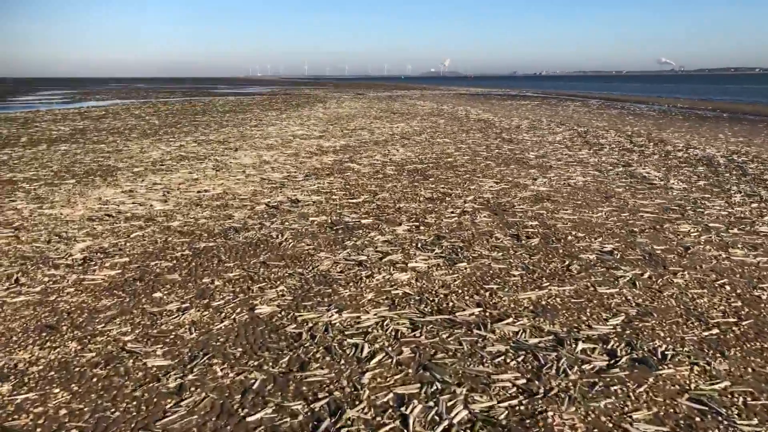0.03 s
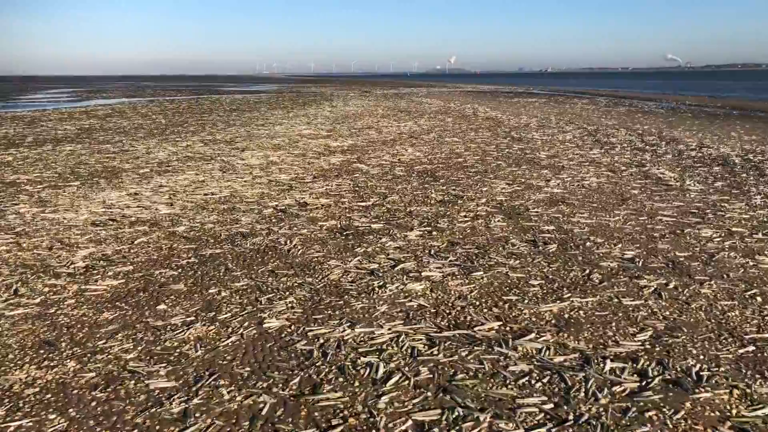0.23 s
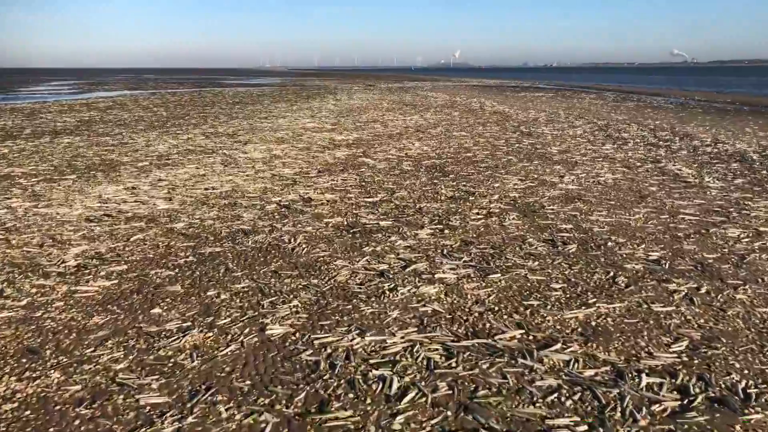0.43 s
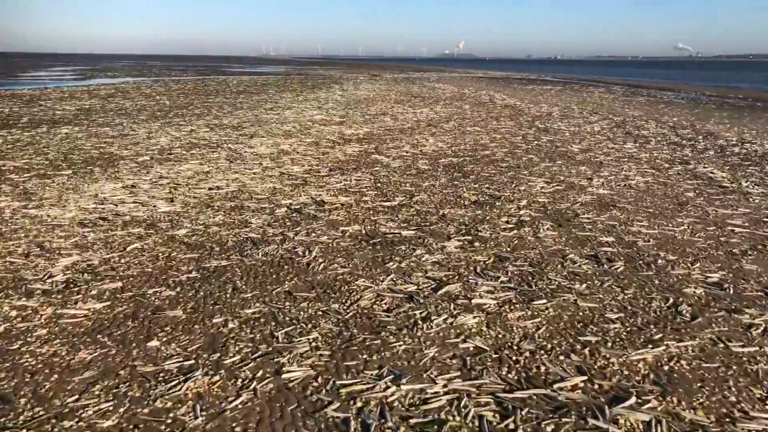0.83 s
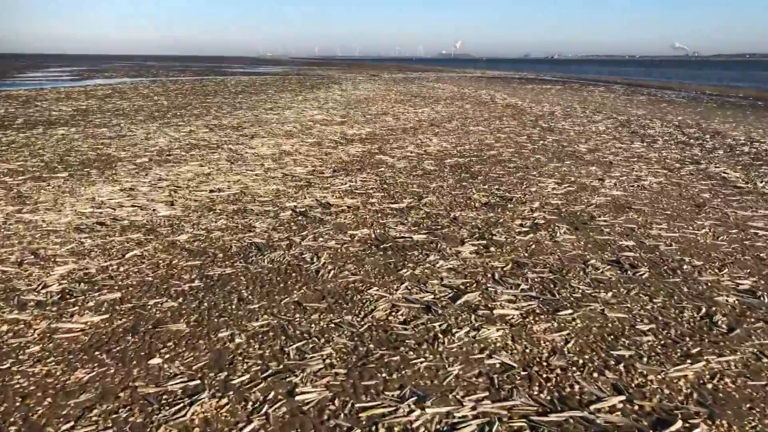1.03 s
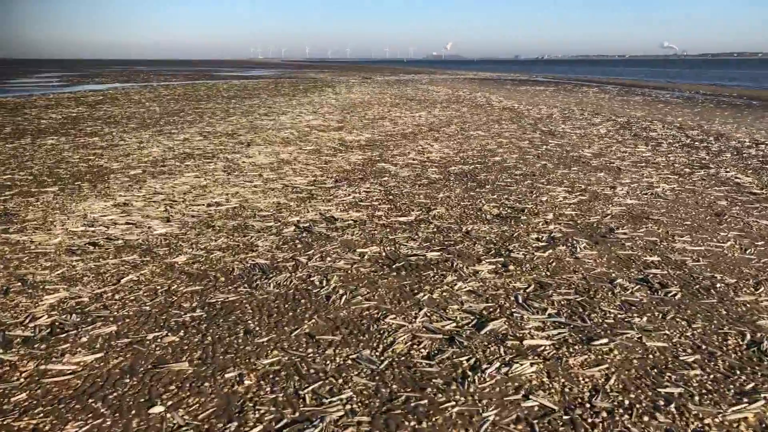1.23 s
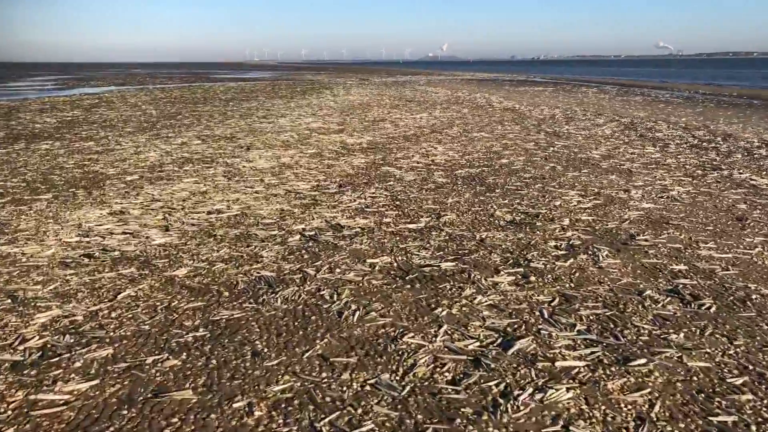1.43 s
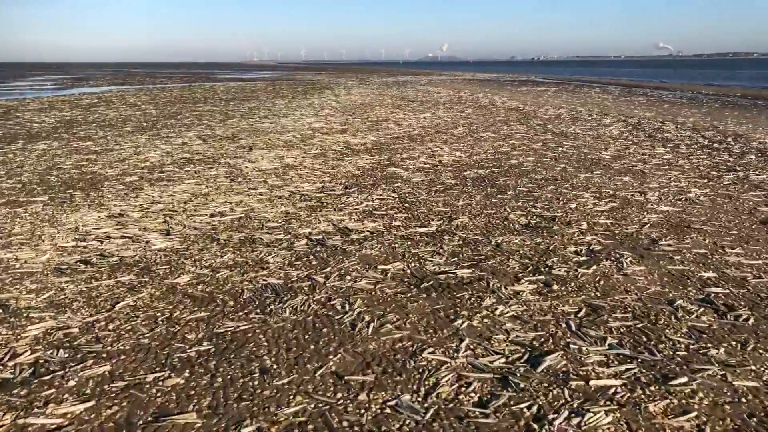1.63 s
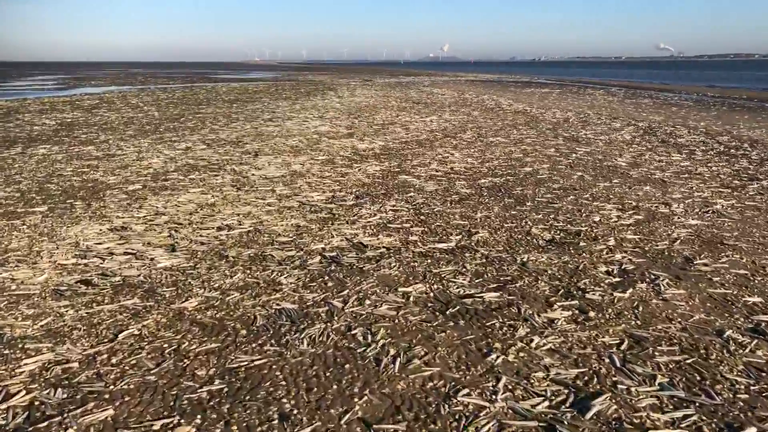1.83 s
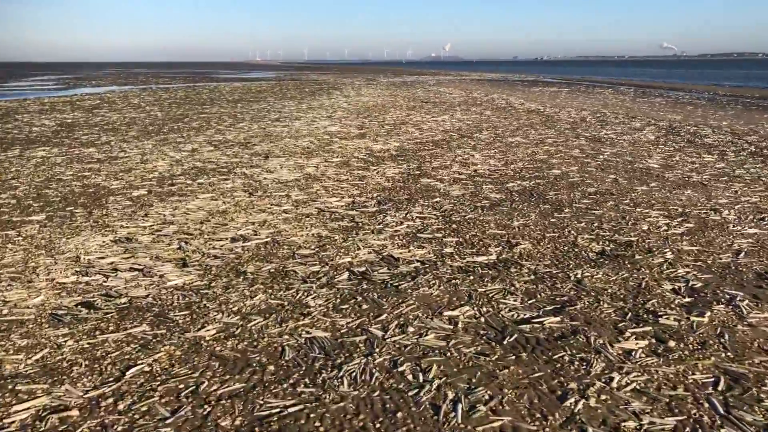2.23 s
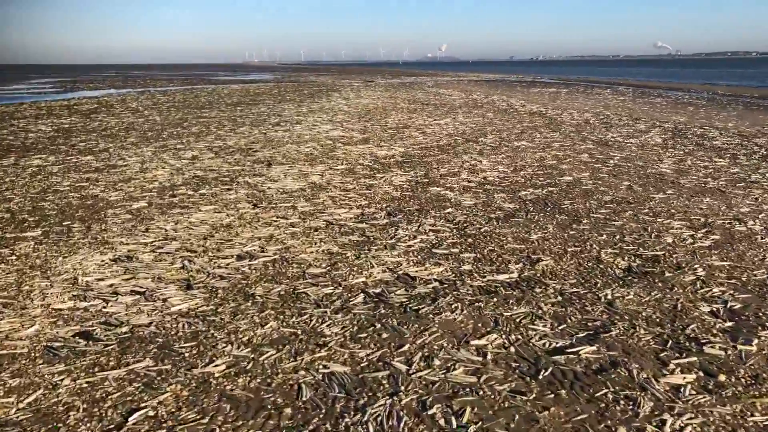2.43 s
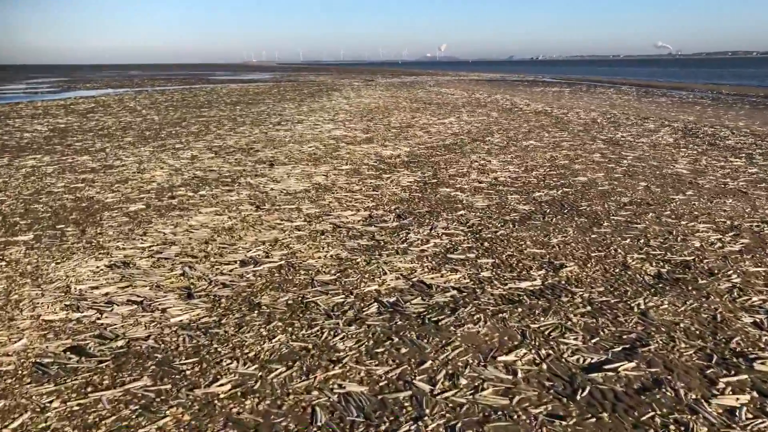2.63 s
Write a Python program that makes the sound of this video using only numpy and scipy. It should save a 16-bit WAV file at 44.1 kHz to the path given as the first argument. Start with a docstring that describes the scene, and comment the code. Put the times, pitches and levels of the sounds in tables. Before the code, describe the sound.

Shells crunching and snapping under slow footsteps, with light wind rumbling on the microphone.

```python
"""Slow steps over empty shells on an open beach flat, close to the microphone, in light wind.
A few shells snap as the weight shifts, then the heaviest footfall crushes a mass of them near 0.5 s.
Lighter crunches follow near 1 s, 1.6 s and 2.2 s, and single snaps close the scene. Throughout, wind
rumbles, tread and gusts thump at the microphone, and every crack sweeps downward, as its treble
travels faster than its bass."""
import sys
import numpy as np
from scipy import signal
from scipy.fft import rfft, irfft
from scipy.io import wavfile
from scipy.ndimage import uniform_filter1d

SR = 44100
rng = np.random.default_rng(int(sys.argv[2]) if len(sys.argv) > 2 else 0)


def dump_mix(stems):
    """Bounce the given channels to the path in sys.argv[1] as a 16-bit WAV at rate SR."""
    frames = np.atleast_2d(stems).T  # one column per channel
    limited = np.clip(frames, -1, 1)  # hard clip at full scale
    pcm = np.round(limited * 32767).astype(np.int16)
    wavfile.write(sys.argv[1], SR, pcm)


N = 119070
TOP_HZ = 16100  # upper edge of the splinters and of the recorder


def amp(db):
    return 10 ** (np.asarray(db) / 20)


def unit_energy(x):
    return x / np.sqrt(np.sum(x ** 2) + 1e-20)


def level_curve(points):
    """Gain at each sample, from (t/s, level/dB) points."""
    return amp(np.interp(np.arange(N) / SR, *np.transpose(points)))


def colour(points, hz):
    """Gain at each frequency, from (f/Hz, level/dB) points."""
    f, db = np.transpose(points)
    return amp(np.interp(np.log(hz + 1), np.log(f), db))


def noise(points):
    """Noise of rms 1 with the given spectral shape."""
    spectrum = rfft(rng.standard_normal(N)) * colour(points, np.fft.rfftfreq(N, 1 / SR))
    return unit_energy(irfft(spectrum, N)) * np.sqrt(N)


def add(mix, start_s, sound):
    part = mix[max(round(start_s * SR), 0):][:len(sound)]
    part += sound[:len(part)]


# Spectrum of the air far out on the flat: f/Hz, relative level/dB
HISS_SPECTRUM = [(100, 0), (400, -1.5), (1000, -6), (2800, -7), (6000, -14), (10000, -24), (16000, -17)]
def distant_hiss(level_db=-57):
    """The open flat hisses steadily, far from the microphone."""
    return amp(level_db) * noise(HISS_SPECTRUM)


# Gusts at the microphone: t/s, level/dB
GUSTS = [(0, -50.5), (.13, -56), (.2, -54), (.26, -36), (.37, -41.5), (.42, -32.5), (.47, -46), (.52, -38),
         (.6, -37.5), (.69, -46), (.76, -36), (.88, -35.5), (.96, -42), (1.03, -34.5), (1.13, -43),
         (1.2, -51), (1.3, -49.5), (1.36, -41), (1.47, -41), (1.549, -28.5), (1.63, -42), (1.7, -44),
         (1.78, -56), (1.88, -43.5), (1.98, -56.5), (2.08, -38), (2.2, -43.5), (2.3, -53), (2.36, -45.5),
         (2.46, -37), (2.53, -50), (2.6, -40), (2.7, -49.5)]
# Spectrum of their rumble: f/Hz, relative level/dB
RUMBLE_SPECTRUM = [(20, -50), (28, -21), (40, -7.5), (60, 1.5), (80, -1), (120, -3), (220, -9),
                   (400, -16.5), (800, -45.5), (2000, -66)]
def wind():
    """Light wind buffets the microphone with a gusty rumble."""
    return level_curve(GUSTS) * noise(RUMBLE_SPECTRUM)


# Tread or gusts at the microphone: t/s, swing level/dB, f/Hz, knock level/dB
THUMPS = [(0.247, -17.5, 218.6, -26), (0.282, -33, 163.2, -42), (0.297, -30, 123.7, -51),
          (0.406, -23.5, 200.7, -51), (0.42, -28, 315, -31), (0.437, -21.5, 460.4, -19),
          (0.538, -27, 270, -34), (0.577, -20.5, 227.3, -31), (0.586, -25, 216.7, -30),
          (0.637, -25.5, 164.4, -51), (0.755, -23, 172, -46), (0.781, -23.5, 259, -49),
          (0.819, -31.5, 158, -51), (0.865, -21.5, 205, -25.5), (0.883, -33, 125.4, -40),
          (0.921, -29.5, 163.4, -47), (1.011, -29.5, 283, -39), (1.033, -35, 330, -28.5),
          (1.067, -31, 231, -46), (1.144, -31, 151.7, -38), (1.411, -29.5, 305, -31),
          (1.449, -31.5, 138.5, -50), (1.498, -27.5, 142, -36), (1.515, -19.5, 287.8, -32),
          (1.533, -20.5, 260, -26), (1.584, -22, 137.4, -45), (2.022, -25.5, 206.4, -45),
          (2.145, -23.5, 141.7, -44), (2.401, -29, 219.3, -36.5), (2.413, -22.5, 331, -28.5),
          (2.466, -30, 175, -46), (2.589, -31, 168.6, -49), (2.628, -29.5, 172.7, -46)]
def thumps(swing_gain_db=3, knock_gain_db=2):
    """A brief knock, then a pressure swing of a cycle or two that falls in pitch."""
    rise_cycles, fall_cycles, sag_per_cycle = 0.32, 0.65, 0.2
    knock_hz, knock_width_s, knock_lead_s = 537, 0.00097, 0.0019
    out, t = np.zeros(N), np.arange(-SR // 20, SR // 20) / SR
    for at_s, swing_db, hz, knock_db in THUMPS:
        phase, knock_phase = rng.random(2)
        cycles = t * hz
        swell = np.exp(-.5 * (cycles / np.where(t < 0, rise_cycles, fall_cycles)) ** 2)
        falling_hz = hz * np.exp(-sag_per_cycle * np.clip(cycles, -2, 2))
        swing = swell * np.sin(2 * np.pi * (np.cumsum(falling_hz) / SR + phase))
        knock = np.exp(-.5 * ((t + knock_lead_s) / knock_width_s) ** 2)
        knock *= np.sin(2 * np.pi * (knock_hz * t + knock_phase))
        thump = amp(swing_db + swing_gain_db) * swing + amp(knock_db + knock_gain_db) * knock
        add(out, at_s + t[0], thump)
    return out


def shell_ring(t, low_hz=2210, top_hz=15420, decay_s=0.004, modes=44):
    """A broken shell rings briefly in many damped modes."""
    pitch, life, strength, phase = rng.random((4, modes, 1))
    mode_hz = low_hz * (top_hz / low_hz) ** pitch
    decay = np.exp(-t / (decay_s * (.5 + life)))
    return unit_energy((strength * np.sin(2 * np.pi * (mode_hz * t + phase)) * decay).sum(0))


LEAD_S = 0.006  # room for the strain ahead of each crack
# Colour of every crack, close to the microphone: f/Hz, relative level/dB
SHELL_SPECTRUM = [(400, 6), (700, 3.5), (1200, 3), (1700, -2), (3000, -1), (4800, -1.5), (7000, -0.5),
                  (12000, 2.5), (16000, 0.5)]
def fracture(after_db, resonance_hz, resonance_q=2.7, size=2048):
    """A shell strains, cracks, sheds chips and rings: body, crack, splinter bands, each of energy 1."""
    t, hz = np.arange(size) / SR, np.fft.rfftfreq(size, 1 / SR)

    def burst(decay_s, roughness=1):
        return unit_energy(rng.standard_normal(size) * roughness * np.exp(-t / decay_s))

    strain = amp(-9) * burst(decay_s=0.001)[::-1]  # tiny cracks build up; wraps to before the break
    tick_and_tear = unit_energy(amp(-5) * (t == 0) + burst(decay_s=0.00031))
    chips = amp(-4) * burst(decay_s=0.0072, roughness=amp(6.5 * rng.standard_normal(size)))
    ring = amp(-2) * shell_ring(t)
    ground_scatter = amp(-22) * burst(decay_s=0.0056)
    wave = strain + tick_and_tear + amp(after_db) * (ring + chips) + ground_scatter
    # The bass arrives late: about 2 ms of lag at 1 kHz.
    sweep_turns = 2.1 * rng.uniform(0.5865, 1.4) * np.log(hz + 119)
    delay = np.exp(-2j * np.pi * (sweep_turns + hz * LEAD_S))
    detuning = hz / resonance_hz - resonance_hz / (hz + 1)
    resonance = 1 + amp(5) / (1 + 1j * resonance_q * detuning)
    spectrum = rfft(wave) * resonance * colour(SHELL_SPECTRUM, hz) * delay
    low, mid, top = (1 - 1 / (1 + (hz / edge_hz) ** 6) for edge_hz in (444, 1490, 5670))  # high-passes
    body, crack, splinter = low * (1 - mid), mid * (1 - top), top * (hz < TOP_HZ)
    return np.array([unit_energy(irfft(spectrum * band)) for band in (body, crack, splinter)])


def crackle(per_s, spread_db, shells=24, window=1000):
    """Small pieces break at random, at a roughly steady level in each of the three bands."""
    hits = amp(spread_db * np.minimum(rng.exponential(1, N), 4))
    hits *= (rng.random(N) < per_s / SR) * rng.choice([-1, 1], N)
    local_power = abs(uniform_filter1d(hits ** 2, window))
    hits /= np.sqrt(local_power + 0.1 * np.mean(hits ** 2))
    which_shell = rng.integers(0, shells, N)
    bands = np.zeros((3, N))
    for k, hz in enumerate(np.geomspace(1700, 9300, shells)):
        piece = fracture(after_db=-13.5, resonance_hz=hz)
        bands += signal.oaconvolve((hits * (which_shell == k))[None], piece, axes=1)[:, :N]
    return bands


# Loose shells ticking on the ground nearby: t/s, relative level/dB
SETTLING = [(0, -3), (.25, -5), (.6, 8), (1.15, -2), (1.25, -3), (1.5, 3), (1.9, -1.5), (2.1, 3.5),
            (2.33, -9.5), (2.7, -2.5)]
def loose_shells(band_db=(-60, -57.5, -69.5)):
    """Shells tick faintly as they settle around the steps."""
    ticks = crackle(per_s=130, spread_db=4, shells=12, window=6000)
    return level_curve(SETTLING) * (amp(band_db) @ ticks)


# Weight on the shell bed, close by: t/s, length/s, body level/dB, crack level/dB, splinter level/dB
CRUSHES = [(0.348, 0.031, -62, -39, -44), (.388, 0.014, -36.5, -27.5, -26.5),
           (0.405, 0.032, -34.5, -31, -25.5), (0.449, 0.069, -39, -46, -48), (0.489, 0.069, -34, -40, -37),
           (0.572, 0.092, -50, -57.5, -58), (0.726, 0.37, -66, -56, -59), (1.006, 0.08, -38, -42.5, -44),
           (1.095, 0.062, -52, -52.5, -60), (1.31, 0.07, -58, -55, -65), (1.381, 0.049, -70, -54, -54),
           (1.484, 0.19, -54.5, -54, -59), (1.59, 0.04, -40.5, -44, -50), (1.637, 0.063, -37, -42, -38.5),
           (1.712, .14, -47, -50.5, -52), (1.917, 0.026, -59, -55, -63), (2.147, 0.046, -38.5, -47, -48),
           (2.212, 0.064, -49, -54, -55.5)]
def crunch(press_s=0.0023, relax_s=0.0094):
    """Coarse pieces and fine grit crackle while a sole presses down."""
    t, power = np.arange(N) / SR, np.zeros((3, N))
    for start, length, *band_db in CRUSHES:
        press = np.clip((t - start) / press_s, 0, 1)
        relax = np.exp(-np.maximum(t - start - length, 0) / relax_s)
        power += (amp(band_db)[:, None] * press * relax) ** 2
    grit_share = np.array([0.13, 0.7, 0.67])[:, None]  # of the power in each band
    coarse = np.sqrt(1 - grit_share) * crackle(per_s=240, spread_db=3.5)
    grit = np.sqrt(grit_share) * crackle(per_s=4500, spread_db=3.5)
    return (np.sqrt(power) * (coarse + grit)).sum(0)


# Single shells underfoot, close to the microphone:
# t/s, body level/dB, crack level/dB, splinter level/dB, ring and chips gain/dB, resonance f/Hz
SNAPS = [(0.0427, -39, -41.5, -52.5, -7, 1700.0), (0.0612, -52, -63, -70, -2, 2360.0),
         (0.1722, -46, -40.5, -66, -12, 2340), (0.1955, -63, -51.5, -58, -3, 2480.0),
         (0.264, -44.5, -48.0, -74, 0.0, 2650), (0.281, -48, -46, -56, -31, 2480.0),
         (0.298, -50, -35, -46.5, -6, 2230), (0.3202, -51, -41, -51, 0, 2670.0),
         (0.337, -42, -43, -43, 9, 2200), (0.3534, -61, -36.5, -29, -10.0, 6740),
         (0.366, -41, -38, -35.0, 13, 2300.0), (0.4111, -34, -21.5, -22, 14, 4930),
         (0.4263, -29.5, -22.5, -25, -1, 4970), (0.4704, -33, -48, -40, -4, 1700.0),
         (0.4842, -58, -40, -35, -5, 1700.0), (0.5006, -26, -30.5, -23.5, 2, 1700.0),
         (0.5055, -25, -35, -24.0, 5, 1700.0), (0.512, -32, -30.0, -26.5, -7, 5660),
         (0.5242, -42, -35.0, -29.5, -21, 3270.0), (0.5353, -53, -34, -52, -15, 3620.0),
         (0.547, -27, -38.5, -32.5, 15, 1700.0), (0.564, -56, -48, -44, -7, 1700.0),
         (0.606, -57, -42.0, -41.5, -19, 2420.0), (0.6202, -33, -40, -38, -25, 1700.0),
         (0.6329, -37, -27, -38, -6, 2310), (0.6419, -35, -49, -35.0, -4, 7250),
         (0.6543, -36, -44, -37.5, -19, 1700.0), (0.6692, -45, -45.0, -44.5, -16, 2360.0),
         (0.7409, -36, -36, -53, -14, 2400), (0.7433, -41.5, -31.5, -46, -18, 2300),
         (0.7619, -52, -47, -48.0, 0.0, 5010.0), (0.7801, -40.5, -30.5, -34, -3.5, 2190.0),
         (0.8044, -36, -30.5, -38, -14, 2230), (0.8174, -37.5, -33, -28.5, -8, 2870),
         (0.849, -39, -35, -44, 1, 2600), (0.8531, -37.5, -41, -44.0, -7, 2280),
         (0.8786, -45, -45, -49, 1, 2400), (0.9083, -54.0, -51, -51, -15, 2360.0),
         (0.9483, -50.0, -42.5, -45, -11, 2880.0), (0.9775, -69, -43, -50, -23, 4230),
         (1.0195, -44.0, -38.5, -30.5, 1, 1790.0), (1.042, -37, -39.0, -47.0, 8, 1700.0),
         (1.0638, -36, -34, -43, -3, 1700.0), (1.0859, -32, -37.5, -55, -21, 1980.0),
         (1.1194, -39.5, -42.0, -35.5, -22, 6780.0), (1.1243, -53.0, -45.0, -36.5, -12, 6950.0),
         (1.1332, -46, -47.0, -47, -12, 6450.0), (1.1501, -43, -47, -47, -14, 1700.0),
         (1.1765, -43, -41.5, -53.0, -24, 2170), (1.196, -47.5, -72, -65.0, -6, 1700.0),
         (1.2098, -50, -75, -51, -11, 6130.0), (1.244, -56, -56, -45, 4, 1700.0),
         (1.2689, -53, -40.5, -41.5, -11, 4600), (1.3102, -34, -42, -59, -11, 2280),
         (1.3179, -44.0, -45, -37.5, -7.0, 1700.0), (1.3317, -50.0, -41.5, -56, -24, 2360.0),
         (1.3598, -41, -40.5, -35.0, -13, 5980.0), (1.3945, -37.5, -42.0, -47.0, -3, 3920),
         (1.4021, -51, -40.5, -40, -4, 2760), (1.4174, -41.0, -47, -42, -8, 6500),
         (1.465, -53, -41.5, -54, -12, 3900.0), (1.4771, -43.5, -42, -42.5, -15, 1700.0),
         (1.5307, -40, -39, -42.5, 5, 3260), (1.5687, -45, -40, -50.0, 6, 3170),
         (1.6126, -34.5, -35.5, -41, -36, 1700.0), (1.6267, -45, -42, -39, -8, 2810.0),
         (1.6837, -29, -38.5, -33.5, -6, 2030.0), (1.6989, -30, -38, -49, -5, 2030.0),
         (1.7173, -35, -38.5, -42.0, -6, 1700.0), (1.727, -31, -34.5, -35, -7, 2200),
         (1.764, -33.5, -32.0, -29, -2, 5140.0), (1.7785, -41.0, -42.0, -33.5, 0, 2300.0),
         (1.7898, -39, -38.5, -48.0, -34, 2360.0), (1.8172, -36, -48, -38, -8, 1700.0),
         (1.8339, -38, -42.0, -36, -4, 2250), (1.8597, -41.5, -40.5, -35, -8.5, 2130.0),
         (1.9002, -49, -41.5, -35, -11, 7560), (1.915, -55, -41, -53, -4, 2760),
         (1.9256, -36.5, -41.5, -67, -12, 1700.0), (1.934, -40, -42.5, -52.0, -26, 1700.0),
         (1.9778, -68, -59, -47, -10, 7310.0), (2.0017, -72, -62, -51, -7.0, 2300.0),
         (2.0532, -50, -41, -68, -14, 2050), (2.1353, -52, -37, -49, 8, 2150),
         (2.1547, -37.5, -40.5, -36.5, 3, 4900), (2.1779, -32.5, -59, -42.0, -12, 1700.0),
         (2.2039, -38.5, -47, -58, -8, 1700.0), (2.224, -42, -37.5, -42, -13, 2830),
         (2.2437, -31, -34, -24.5, -8.5, 5470), (2.303, -54, -56.5, -71, -12, 3710.0),
         (2.3568, -42, -39, -38.0, -4, 6340), (2.449, -38, -32, -43.5, -18, 2320),
         (2.497, -47.5, -38.5, -58, -9, 2400), (2.5273, -53, -45, -60, -11.0, 2980),
         (2.542, -40.5, -69, -70, -5, 1700.0), (2.587, -70, -38.5, -37, 11, 7130.0),
         (2.6243, -63, -35.5, -34.5, -2, 2780), (2.6838, -42.5, -33.5, -35.0, 4.5, 5840)]
def snaps(gain_db=-1.5, level_span_s=0.0081):
    """Larger shells break one by one as the weight shifts."""
    out = np.zeros(N)
    for at_s, *band_db, after_db, resonance_hz in SNAPS:
        add(out, at_s - LEAD_S, amp(band_db) @ fracture(after_db, resonance_hz))
    return out * amp(gain_db) * np.sqrt(level_span_s * SR)  # levels are averages over this span


def scene():
    """Steps and wind on the beach flat, at one microphone."""
    return (snaps() + crunch() + loose_shells() + thumps() + wind() + distant_hiss())[None]


def record(dry):
    """The recorder's band limit cuts the highest treble."""
    low_pass = signal.firwin(401, TOP_HZ, window=("kaiser", 8), fs=SR)
    return signal.oaconvolve(dry, low_pass[None], "same")


dry = scene()
out = record(dry)
dump_mix(out)
```